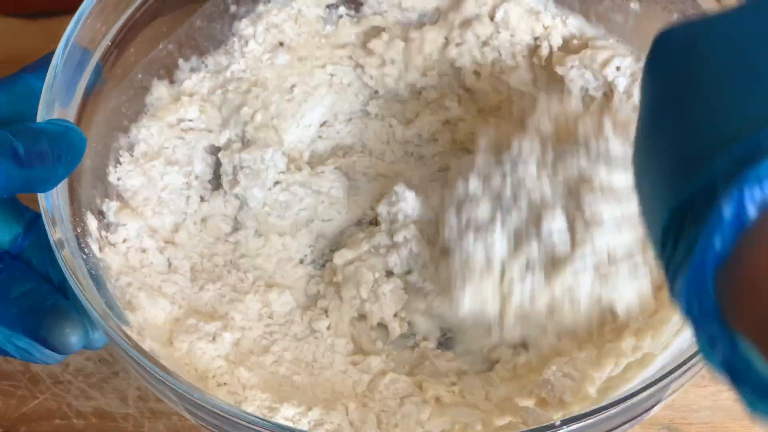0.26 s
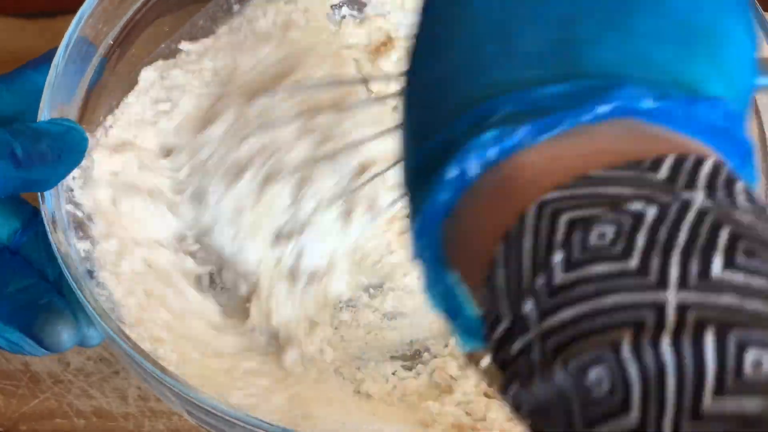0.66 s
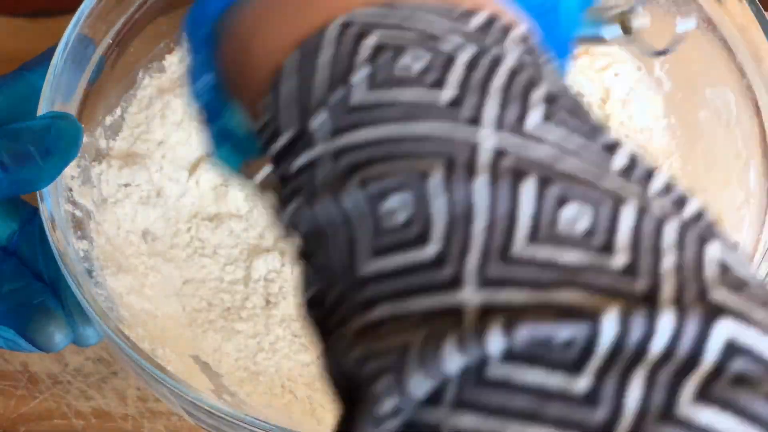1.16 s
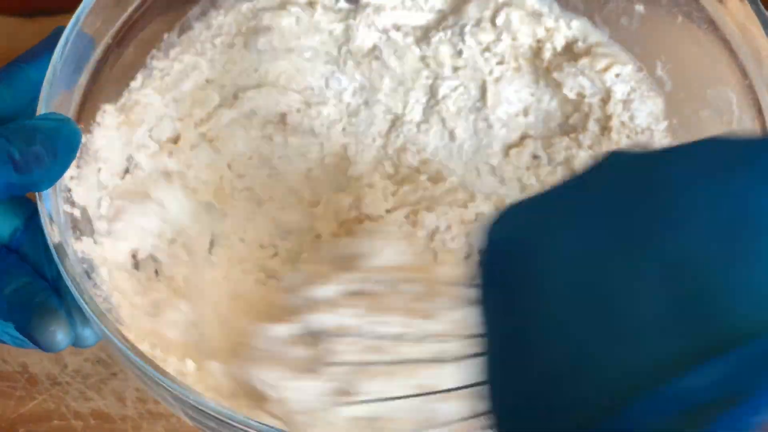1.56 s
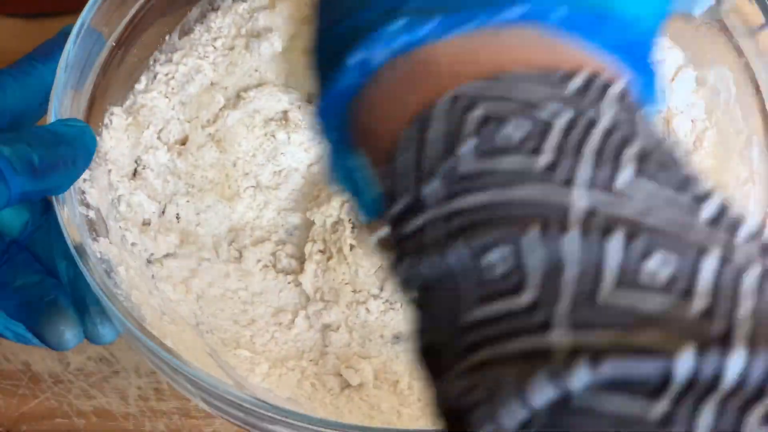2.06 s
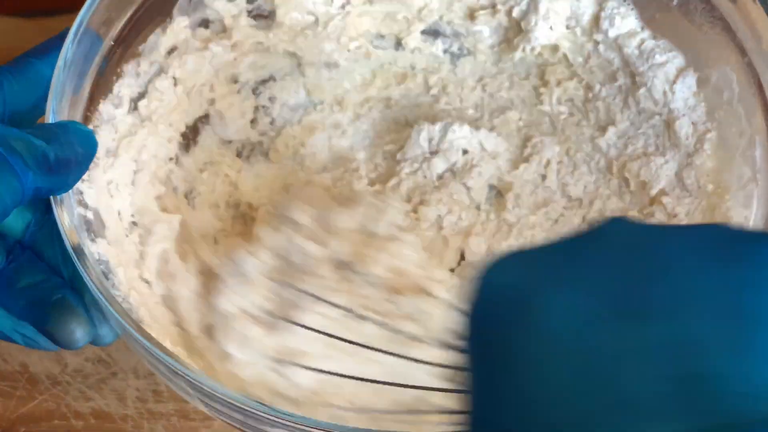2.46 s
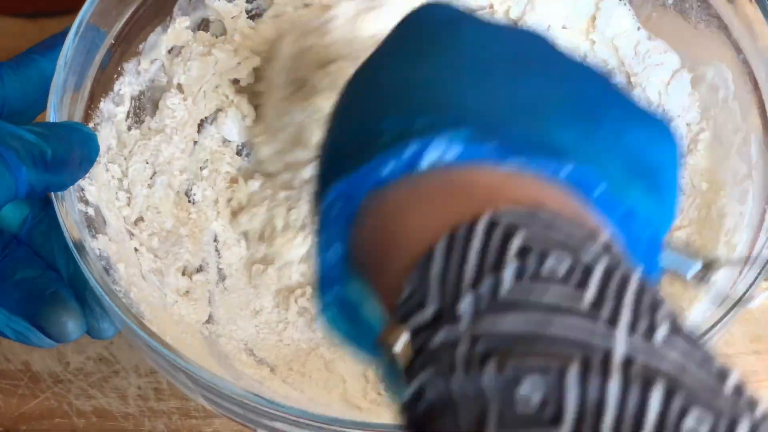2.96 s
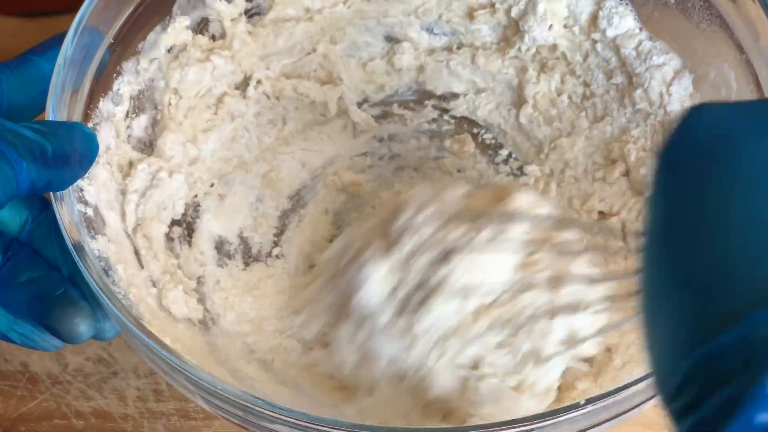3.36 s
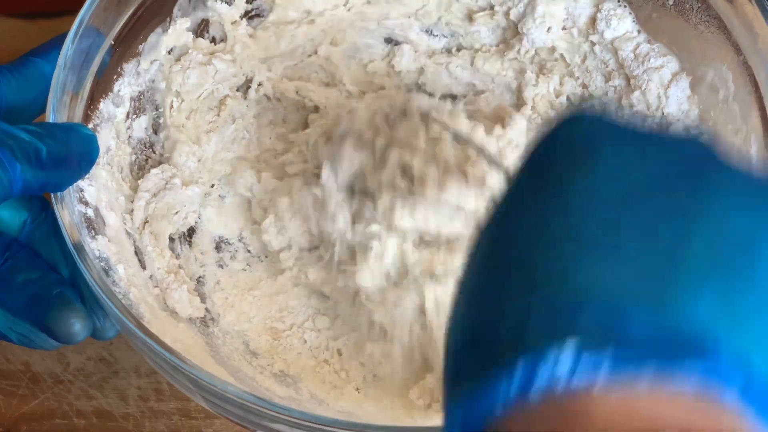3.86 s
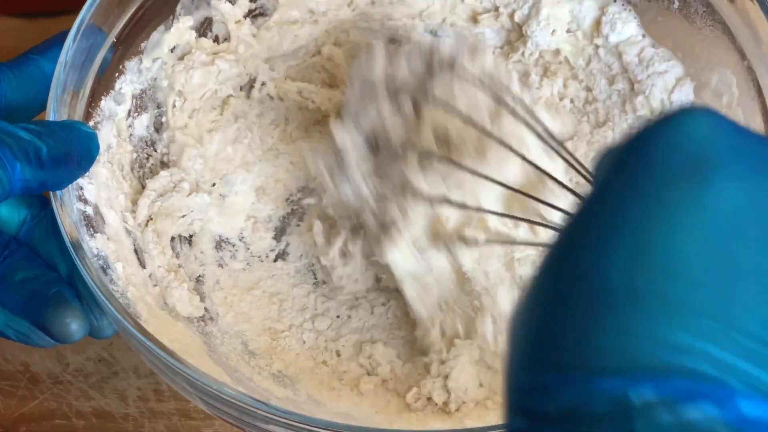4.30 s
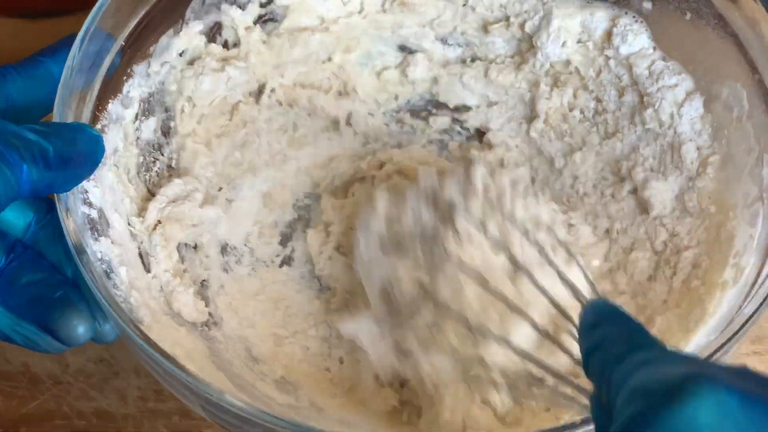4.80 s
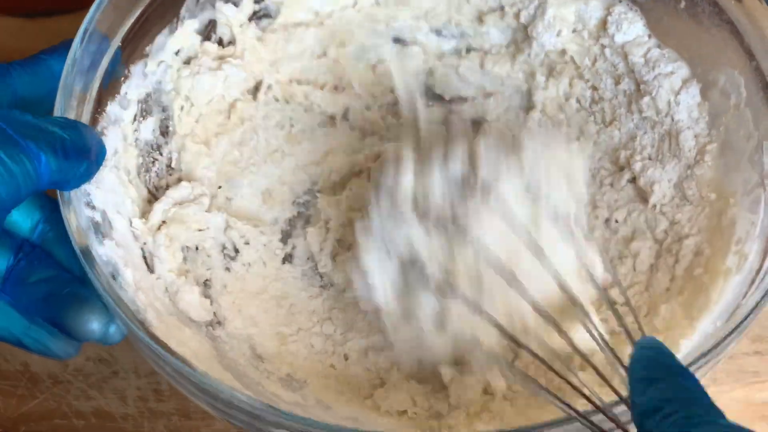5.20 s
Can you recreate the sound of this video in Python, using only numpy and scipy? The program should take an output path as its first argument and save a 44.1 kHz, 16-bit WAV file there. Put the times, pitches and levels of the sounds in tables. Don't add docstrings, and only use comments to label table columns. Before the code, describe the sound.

Heard closely in a modest kitchen, a wire whisk stirs stiff dough in a glass bowl. From 0 to 3.7 seconds the scrape is faint, gritty and bright, over a soft, damp squelch with small sticky crackles. The rocking bowl knocks its foot on a wooden board several times a second; clearer clicks fall near 0.3, 1.45 and 2.4 seconds, with duller thumps between. At about 3.73 seconds a sudden hard rap jolts the bowl, far louder than the stirring. Light knocks return around 3.9 to 4.2. At 4.65 a stronger rap sets off a rattling run of bounces until 4.83, with a short glassy ring and deep worktop thump. Another similar burst comes at 5.1 to 5.25, its dough slump and brief room reverberation still fading at the end. A steady faint room hum, low rumble and barely audible motor whine stay underneath.

```python
import sys
import numpy as np
from scipy import signal
from scipy.io import wavfile
from scipy.ndimage import uniform_filter1d, minimum_filter1d

SR = 44100
rng = np.random.default_rng(int(sys.argv[2]) if len(sys.argv) > 2 else 0)


def to_wav(sig):
    pcm = np.clip(np.atleast_2d(sig), -1, 1) * 32767
    pcm = np.round(pcm).astype(np.int16)
    wavfile.write(sys.argv[1], SR, pcm.T)


def volts_from_decibels(level):
    exponent = np.asarray(level, float) / 20
    return 10 ** exponent


N = 239992

# (frequency [Hz], density [dB per Hz])
HUM = [(45, -10), (90, -23.5), (155, -3), (300, -20), (800, -21.5), (1100, -30.5), (2500, -32),
       (4000, -40.5), (8700, -39.5), (12000, -48.5), (16500, -42)]
# (frequency [Hz], density [dB per Hz])
SCRAPE = [(2000, -9), (3500, -2), (5500, -1), (8500, 3), (10000, 3.5), (12000, -32), (15000, -10)]
# (frequency [Hz], density [dB per Hz])
SQUELCH = [(200, -9), (500, 2.5), (1200, 9), (2200, 5.5), (3200, -8.5), (5000, -20), (8000, -43)]
# (time [s], scrape level [dB])
STIR = [(0.0, -59.5), (0.3, -59), (0.36, -70), (0.7, -67), (0.85, -74), (1.18, -76), (1.4, -71.5),
        (1.7, -64), (2.36, -68), (2.47, -61.5), (2.55, -67.5), (2.94, -68), (3.35, -73), (3.65, -89),
        (4.12, -63), (4.45, -77), (4.82, -86), (5.44, -79)]
# (time [s], snap
# [dB], board [dB], thump [dB])
ROCKS = [(0.0034, -55, -36.5, -31), (0.3232, -21.5, -39.5, -32.5), (0.6911, -32, -46, -37.5),
         (0.9676, -66, -66, -50.5), (1.0322, -54, -40, -37), (1.4545, -22, -40, -35.5),
         (1.6317, -39, -77, -71), (1.8263, -44, -38.5, -34), (1.8759, -40, -63.5, -45),
         (2.388, -18.5, -36.5, -33), (2.7347, -47, -38.5, -39), (3.2682, -28, -41.5, -37),
         (3.3477, -54, -37, -34), (3.887, -60, -42, -28.5), (3.97, -56.5, -50, -38),
         (4.1471, -21.5, -38.5, -29.5), (4.1895, -46, -43, -32.5)]
# (time [s], snap [dB], board [dB], thump [dB], edge [dB])
BOUNCES = [(3.7253, -31, -30, -21.5, -30), (3.7348, -8, -24, -64, -14.5), (3.7541, -42, -22.5, -57, -23.5),
           (3.7788, -36, -31, -20.5, -28), (4.6566, -4.5, -20.5, -14, -13.5),
           (4.7118, -6.5, -13, -36, -7.5), (4.7189, -3, -36, -13.5, -13), (4.7331, -17, -15, -18, -27),
           (4.7445, -7, -15, -36, -35), (4.7713, -16.5, -42, -55, -35), (4.791, -17.5, -37, -54, -38),
           (4.8303, -23, -50, -25, -46), (5.1153, -6.5, -19, -11.5, -14), (5.175, -9.5, -15, -20, -6.5),
           (5.1886, -13.5, -30, -31, -42), (5.2223, -27, -46, -16.5, -49), (5.2351, -17.5, -18, -16, -35),
           (5.251, -17.5, -25.5, -40, -19.5)]
# (frequency [Hz], level [dB], half length [s])
SNAP = [(2060, -4, 0.0015), (1507, -8, 0.0021), (3700, -27, 0.002)]
# (frequency [Hz], density [dB per Hz], t60 [s])
EDGE = [(1743, -13, 0.065), (2700, -0.5, 0.016), (3740, -10, 0.018), (5380, -6.5, 0.018),
        (7500, -51, 0.0035), (10800, -43, 0.012)]
# (frequency [Hz], density [dB per Hz], t60 [s])
BODY = [(247.7, -5, 0.22), (410, 3, 0.057), (845, 2, 0.06), (1195, 0, 0.022), (1626, -4.5, 0.041),
        (2500, -24, 0.0097), (3400, -40, 0.042)]
# (frequency [Hz], level [dB], t60 [s])
BOARD = [(306, -3, .15), (385, -3, .07), (748, -4, .09), (952, -8, .08)]
# (frequency [Hz], level [dB], t60 [s])
THUMP = [(106, 1, .75), (88, -16, .3), (62, -10, .2), (150, -13, .15), (215, -7, .18)]
# (frequency [Hz], level [dB], t60 [s])
HOLLOW = [(478, 2, .17), (530, 1, .15), (594, 1, .2)]
# (time [s], peak [dB], centre [Hz])
CRACKLES = [(0.148, -46, 6600), (0.445, -38, 7400), (0.5754, -51, 8100), (0.596, -52, 8230),
            (0.9896, -47, 4700), (1.099, -50.5, 10000), (1.5226, -49, 8650), (1.607, -46.5, 9250),
            (1.6683, -49, 4780), (1.716, -46, 5130), (1.731, -46, 6870), (1.805, -42.5, 4360),
            (1.939, -51, 6860), (2.052, -46, 7760), (2.382, -37.5, 3770), (2.576, -50, 4300),
            (2.6352, -50, 4360), (2.6465, -49, 4130), (2.7756, -51, 8700), (2.881, -54, 8150),
            (3.0665, -41, 8600), (3.092, -31, 8300), (3.747, -33, 4100), (3.886, -40, 8800),
            (4.126, -42.5, 8250), (4.4907, -58.5, 9200), (4.712, -23, 7500), (4.713, -42, 13000),
            (5.174, -45, 6500), (3.733, -39, 8700)]
# (time [s], peak [dB], then against it low modes [dB], middle modes [dB], top modes [dB])
TINGS = [
    (2.4122, -57, -12, 18, 9),
    (4.6445, -28, 7, -8, 9),
    (5.1015, -24, 2, 2, -2),
]
# (frequency [Hz], level [dB], t60 [s])
GLASS = [(1879, -5, .1), (2890, -18, .1), (4086, -17, .15), (5408, -12, .05), (6690, -6, .025),
         (6905, 0, .055), (7830, -12, .015), (8550, -3, .05), (10000, -18, .02), (12220, -26, .08),
         (13000, -24, .015), (14300, -26, .03)]
# (frequency [Hz], density [dB per Hz], t60 [s])
SPLASH = [(1980, 3, 0.017), (4500, -26, 0.02), (6500, -2, 0.009), (8700, -22.5, 0.021), (10500, -28, 0.02),
          (15500, -20, .025)]
# (frequency [Hz], t60 [s], tail level [dB])
KITCHEN = [(93, 0.99, -4.5), (285, 0.76, -5.5), (690, 0.43, 0.5), (1645, 0.44, 3), (2720, 0.39, -4),
           (5650, 0.5, -12), (12000, 0.17, 1)]
# (level against the blow [dB], rise [s], t60 [s])
SLUMP = (-17.5, 0.017, 0.85)
# (level against the blow [dB], rise [s], t60 [s])
SLIDE = (-47, .005, 0.37)
# (level against the blow [dB], rise [s], t60 [s])
HEAVE = (-2, 0.011, 0.22)


def rms_one(x):
    return x / np.sqrt(np.mean(x ** 2) + 1e-20)


def at_hz(points, hz, axis=1):
    points = np.array(points)
    return np.interp(np.log(hz), np.log(points[:, 0]), points[:, axis])


def drift(rate_hz):
    pole = np.exp(-80 * np.pi * rate_hz / SR)
    white = rng.standard_normal(N // 40 + 2002)
    slow = signal.lfilter([1], [1, -2 * pole, pole * pole], white)[2000:]
    return np.interp(np.arange(N) / 40, np.arange(len(slow)), rms_one(slow))


def band_noise(low_hz, high_hz, x):
    return signal.sosfilt(signal.butter(2, [low_hz, high_hz], "band", fs=SR, output="sos"), x)


def banded(spectrum, patchy_db, white):
    out, edges = 0, 40 * 2 ** np.arange(0, 8.9, 1 / 3)
    for k, (low, high) in enumerate(zip(edges, edges[1:])):
        level_db = at_hz(spectrum, np.sqrt(low * high)) + patchy_db * drift(4.7)
        out = out + band_noise(low, high, white[k % 2]) * volts_from_decibels(level_db)
    return rms_one(out)


def ring(clicks, hz, t60):
    r, w = volts_from_decibels(-60 / (t60 * SR)), 2 * np.pi * hz / SR
    return signal.lfilter([0, np.sin(w)], [1, -2 * r * np.cos(w), r * r], clicks + 1e-18)


def strike(times, level_db, modes, spread_db, contact_s):
    at, out = np.round(np.array(times) * SR).astype(int), 0
    luck = rng.standard_normal((len(at), 16))
    for k, (hz, mode_db, t60) in enumerate(modes):
        clicks = np.zeros(N)
        clicks[at] = volts_from_decibels(level_db[:, k] + mode_db + spread_db * luck[:, k]) * (-1) ** k
        swell = ring(clicks, hz, contact_s) * 14 / (contact_s * SR)
        out = out + ring(swell, hz, t60)
    return out


def swelling_power(times, level_db, rise_s, t60):
    power = np.full(N, 1e-18)
    power[np.round(times * SR).astype(int)] = volts_from_decibels(2 * level_db)
    rise, fall = np.exp(-1 / (rise_s * SR)), volts_from_decibels(-120 / (t60 * SR))
    return signal.lfilter([1 - rise], np.convolve([1, -rise], [1, -fall]), power)


def crunch(times, level_db, table, rise_s):
    out, white = 0, rng.standard_normal((2, N))
    lowest, highest = table[0][0], table[-1][0]
    edges = lowest * 2 ** np.arange(0, np.log2(highest / lowest) + .4, .5)
    for k, (low, high) in enumerate(zip(edges, edges[1:])):
        hz = np.sqrt(low * high)
        shape = np.sqrt(swelling_power(times, level_db, rise_s, at_hz(table, hz, axis=2)))
        out = out + band_noise(low, high, white[k % 2] * shape) * volts_from_decibels(at_hz(table, hz))
    return out


def blows():
    s, snap_db, board_db, thump_db = np.array(ROCKS).T
    edge_db = snap_db + 1.98 * np.minimum(snap_db - board_db - 25.5, 0)
    rocks = [s, snap_db, board_db, board_db - 2.9, thump_db, edge_db]
    s, snap_db, board_db, thump_db, edge_db = np.array(BOUNCES).T
    hollow_db = -27.5 + 0.47 * snap_db
    return np.hstack([rocks, [s, snap_db, board_db, hollow_db, thump_db, edge_db]])


def aftermath(steady_db, times, blow_db, rule):
    share_db, rise_s, t60 = rule
    swell = swelling_power(times, blow_db + share_db, rise_s, t60)
    return 10 * np.log10(volts_from_decibels(2 * steady_db) + swell)


def room_tone():
    return volts_from_decibels(-55) * banded(HUM, 1.0, rng.standard_normal((2, N)))


def appliance_whine():
    cycles = 1035 * np.arange(N) / SR + .15 * drift(4.0)
    return volts_from_decibels(-64 + 1.5 * drift(3.0)) * np.sin(2 * np.pi * cycles)


def worktop_rumble(rumble_db):
    white = rng.standard_normal(N + SR)
    low = band_noise(8, 24, white) + volts_from_decibels(-14.5) * band_noise(45, 75, white)
    return volts_from_decibels(rumble_db) * rms_one(low[SR:])


def gritty(spectrum, grit_db, patchy_db):
    grains = rng.standard_normal((2, N)) * volts_from_decibels(grit_db * drift(150.0))
    return banded(spectrum, patchy_db, grains)


def wire_scrape(scrape_db):
    return volts_from_decibels(scrape_db - 6.5) * gritty(SCRAPE, grit_db=5.5, patchy_db=1.5)


def dough_squelch(squelch_db):
    return volts_from_decibels(squelch_db - 5) * gritty(SQUELCH, grit_db=2.5, patchy_db=2.2)


def foot_snaps(times, snap_db):
    clicks, t = np.zeros(N), np.arange(-70, 300) / SR
    clicks[np.round(times * SR).astype(int)] = volts_from_decibels(snap_db + 0.5)
    pulse = 0
    for hz, level_db, half_s in SNAP:
        pulse = pulse + volts_from_decibels(level_db) * np.exp(-(t / half_s) ** 2) * np.sin(2 * np.pi * hz * t)
    fade_in = np.sin(np.pi / 2 * np.clip(np.arange(370) / 50, 0, 1)) ** 2
    return signal.oaconvolve(clicks, pulse * fade_in)[:N]


def glass_edge(times, edge_db):
    return crunch(times, edge_db + 4, EDGE, rise_s=0.0004)


def board_body(times, board_db):
    body = crunch(times, board_db + 14, BODY, rise_s=0.0013)
    light_db = np.clip(board_db + 22, -10, 0)[:, None] * [1, 0, 0, 0]
    level_db = board_db[:, None] + light_db - 7
    return body + strike(times, level_db, BOARD, spread_db=3.5, contact_s=0.0049)


def worktop_thump(times, snap_db, board_db, hollow_db, thump_db):
    dull = np.clip((board_db - snap_db) / 10, 0, 1)[:, None]
    lean_db = dull * [-8, 16, 0, 2, -8]
    thump = strike(times, thump_db[:, None] - 3 + lean_db, THUMP, spread_db=1.5, contact_s=.065)
    level_db = hollow_db[:, None] - 8 * dull + np.zeros(3)
    return thump + strike(times, level_db, HOLLOW, spread_db=1.5, contact_s=.015)


def crackles(per_s, stir_db):
    out, t = np.zeros(N), np.arange(600) / SR
    for s, peak_db, hz in CRACKLES:
        i = round(s * SR)
        noise = rng.standard_normal(600) * volts_from_decibels(-60 * t / .012)
        burst = band_noise(hz / 1.2, min(hz * 1.04, 18000), noise)
        burst = burst + volts_from_decibels(-7) * band_noise(1600, 9500, noise)
        out[i:i + 600] += volts_from_decibels(peak_db) * burst / np.abs(burst).max()
    sizes = volts_from_decibels(3.5 * np.minimum(rng.exponential(1, N), 3) + stir_db + 12)
    born, dealt = rng.random(N) < per_s / SR, rng.integers(0, 8, N)
    for k, hz in enumerate(np.geomspace(1800, 13000, 8)):
        out += ring(sizes * born * (dealt == k), hz, 6.9 / hz)
    return out


def tings():
    s, peak_db, low_db, middle_db, top_db = np.array(TINGS).T[:, :, None]
    hz = np.array(GLASS)[:, 0]
    low, middle, top = hz < 3500, (hz > 3500) & (hz < 5000), hz > 7500
    level_db = peak_db + low_db * low + middle_db * middle + top_db * top
    glass = strike(s[:, 0], level_db, GLASS, spread_db=1.0, contact_s=.004)
    splash = crunch(s[:, 0], (peak_db + 12)[:, 0], SPLASH, rise_s=0.00044)
    return glass, splash


def kitchen(x):
    t, edges, tail = np.arange(SR) / SR, 60 * 2 ** np.arange(0, 8.4, .5), 0
    white = rng.standard_normal((2, SR))
    for k, (low, high) in enumerate(zip(edges, edges[1:])):
        hz = np.sqrt(low * high)
        level_db = at_hz(KITCHEN, hz, axis=2) - 60 * t / at_hz(KITCHEN, hz)
        tail = tail + band_noise(low, high, white[k % 2]) * volts_from_decibels(level_db)
    return signal.fftconvolve(x, tail * np.clip(t / 0.0063, 0, 1))[:N]


def scene():
    stir_db = np.interp(np.arange(N) / SR, *np.transpose(STIR))
    effort_db = stir_db + 68
    s, snap_db, board_db, hollow_db, thump_db, edge_db = blows()
    shake_db = board_db + 0.74 * np.clip(snap_db - board_db - 6.5, -25, 5)
    scrape_db = aftermath(stir_db, s, edge_db, SLIDE)
    squelch_db = aftermath(-59.5 + 0.67 * effort_db, s, shake_db, SLUMP)
    rumble_db = aftermath(-41.5 + 0.1 * effort_db, s, thump_db, HEAVE)

    background = room_tone() + appliance_whine() + worktop_rumble(rumble_db)
    stirring = wire_scrape(scrape_db) + dough_squelch(squelch_db)
    snap = foot_snaps(s, snap_db)
    edge = glass_edge(s, edge_db)
    body = board_body(s, board_db)
    thump = worktop_thump(s, snap_db, board_db, hollow_db, thump_db)
    crackle = crackles(120, stir_db)
    glass, splash = tings()

    quiet = volts_from_decibels(-42) * (thump + glass + crackle + snap)
    room = kitchen(volts_from_decibels(-26) * edge + volts_from_decibels(-30.5) * body + volts_from_decibels(-24) * splash + quiet)
    impacts = snap + edge + body + thump + glass + splash + crackle
    return (impacts + room + stirring + background)[None]


def band_limit(x):
    return signal.sosfilt(signal.butter(12, 16450, fs=SR, output="sos"), x)


def record(dry):
    gain = np.minimum(1, .96 / (np.abs(dry) + 1e-9))
    gain = uniform_filter1d(minimum_filter1d(gain, size=257), size=129)
    low_pass = signal.cheby2(10, 50, 16250, fs=SR, output="sos")
    mix = signal.sosfilt(low_pass, dry * gain)
    return band_limit(mix)


dry = scene()
out = record(dry)
to_wav(out)
```